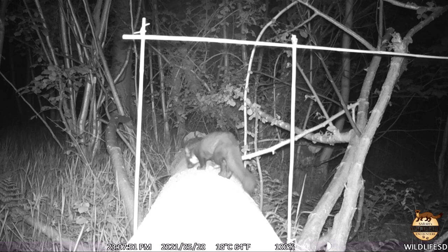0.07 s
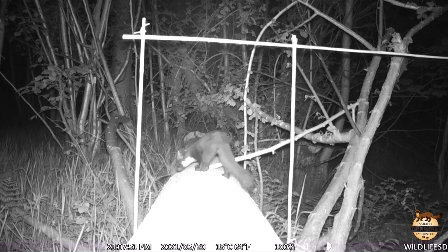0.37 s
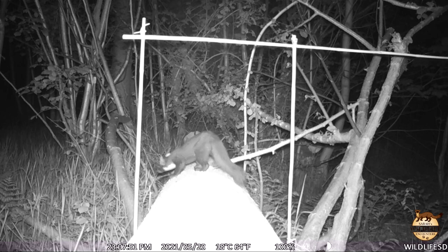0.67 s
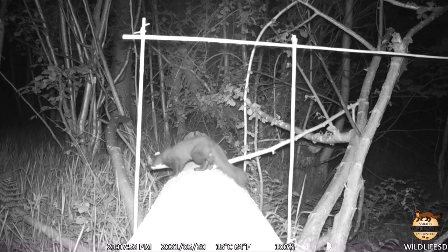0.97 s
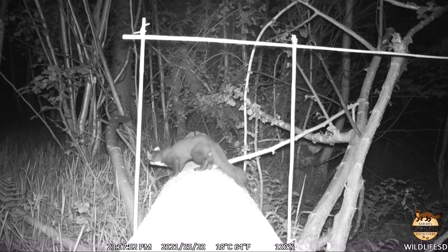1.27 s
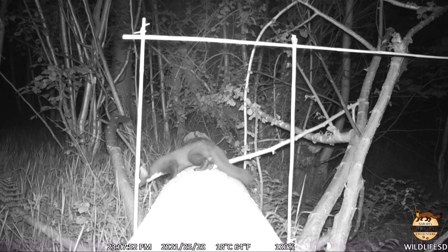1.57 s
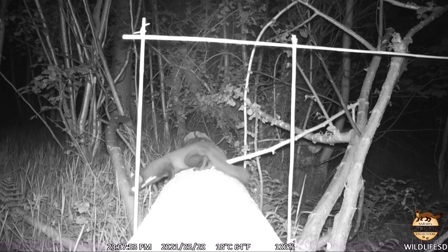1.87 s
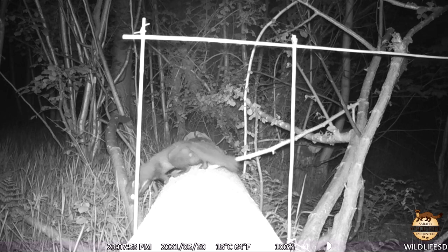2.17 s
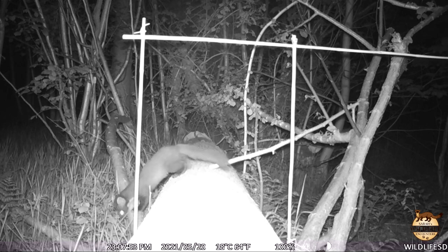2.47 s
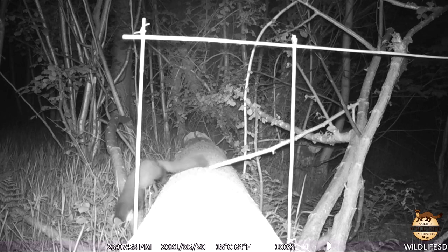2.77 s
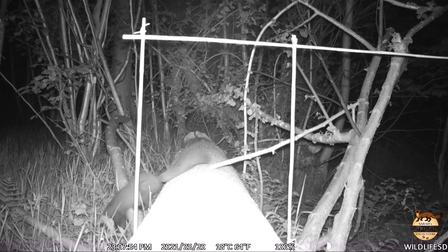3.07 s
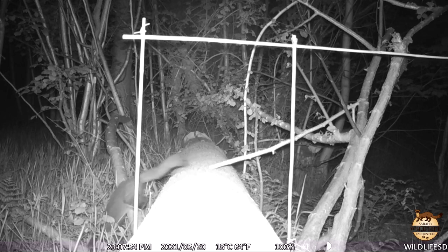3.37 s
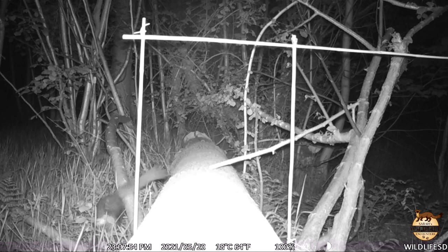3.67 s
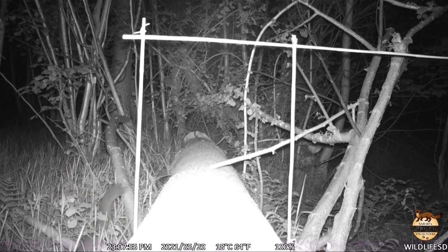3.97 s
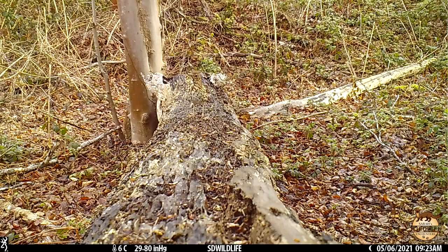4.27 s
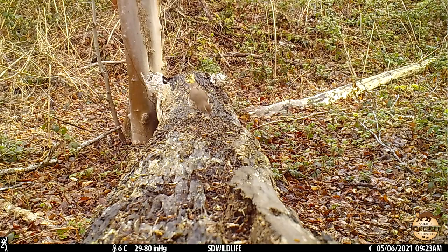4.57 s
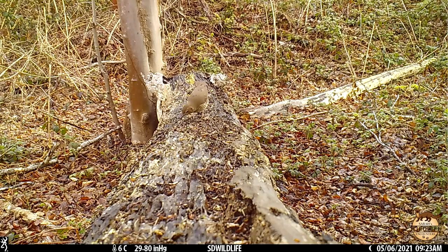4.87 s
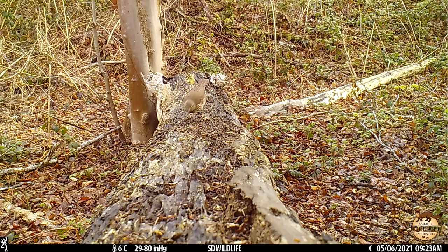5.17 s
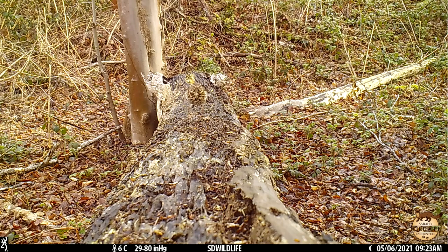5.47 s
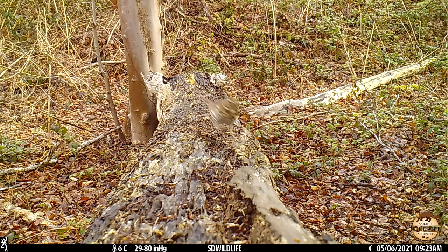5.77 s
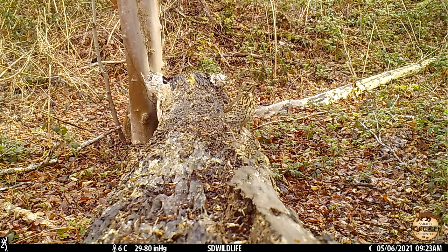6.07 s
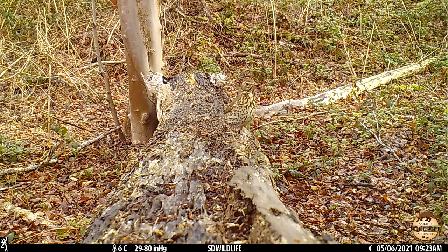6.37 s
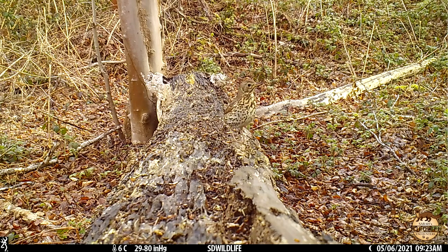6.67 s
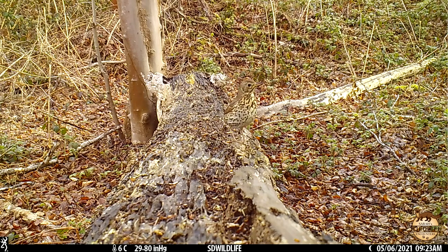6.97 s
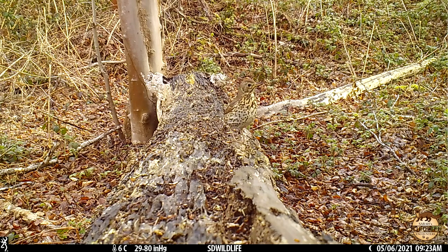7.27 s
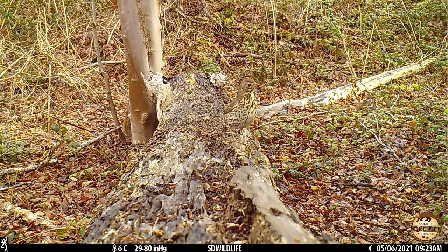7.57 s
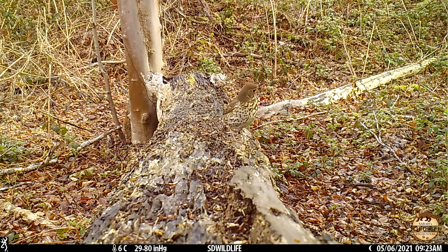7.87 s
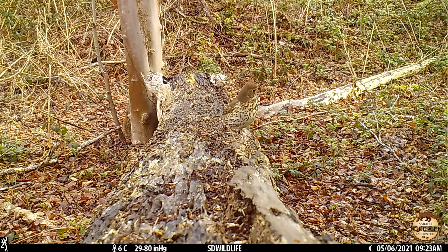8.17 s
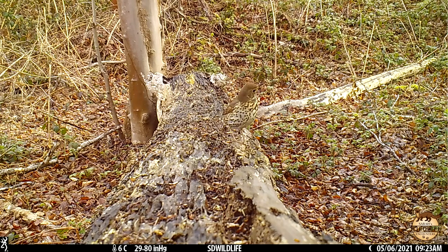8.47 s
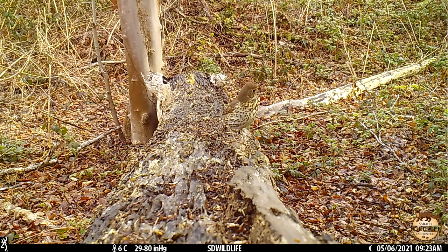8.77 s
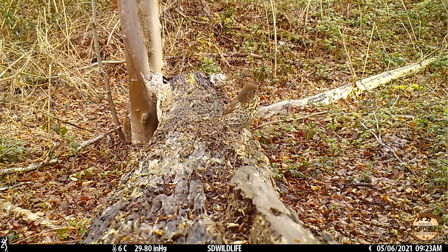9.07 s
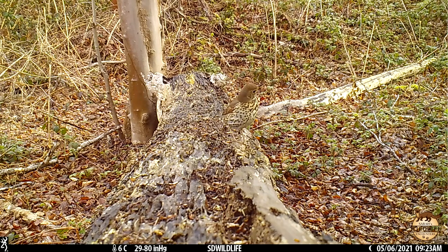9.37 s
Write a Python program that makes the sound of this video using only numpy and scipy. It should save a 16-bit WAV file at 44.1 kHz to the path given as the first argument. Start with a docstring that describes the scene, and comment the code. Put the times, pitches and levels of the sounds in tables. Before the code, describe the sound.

A muffled hiss from an outdoor microphone fills a quiet wood, broken by a single soft peep. Then night changes to day: the hiss turns brighter, with a thin buzz, and small birds sing almost continuously. Clear, quick whistles mix with rougher calls farther off and lower burry phrases. A few tiny ticks come from dry litter, a short trill follows, and a distant engine is barely audible.

```python
"""Songbirds whistle quick gliding notes, near sines from the syrinx that ring on between the trunks.
A lower bird adds burry phrases; hoarse calls and a short trill come from farther off.
Dry litter ticks and a far engine drones faintly. Two trail cameras hear this forest:
first the dull night hiss of one, with a faint peep; at about 4 s it fades over into the
spring morning, with the brighter hiss and thin buzz of the other."""
import sys
import numpy as np
from scipy import signal
from scipy.fft import rfft, irfft
from scipy.io import wavfile
from scipy.ndimage import map_coordinates

SR = 44100
rng = np.random.default_rng(int(sys.argv[2]) if len(sys.argv) > 2 else 0)


def digitize_waveform(pressure):
    """Quantize a signal to 16-bit integers and store it at the path in sys.argv[1].

    Rows of a 2-D input are taken as channels; values are limited to [-1, 1].
    """
    field = np.atleast_2d(pressure).T
    bounded = np.clip(field, -1, 1)
    quanta = np.round(bounded * 32767).astype(np.int16)
    wavfile.write(sys.argv[1], SR, quanta)


N = 424241
FADE_START_S, FADE_END_S = 4.015, 4.31

# clear notes: t/s, length/s, f/Hz, glide/Hz, level/dB
WHISTLES = [ (4.095, 0.031, 3980, -220, -46.5), (4.197, 0.033, 3860, -450, -50.5),
            (4.222, 0.071, 3170, -800, -51), (4.382, .1, 2500, -520, -56.5), (4.51, .065, 2910, 552, -59),
            (4.907, 0.065, 3610, -420, -45), (5.012, 0.032, 3600, 528, -51),
            (5.244, 0.038, 3520, 750, -46.5), (5.28, 0.039, 4030, 120, -46.5), (5.36, .03, 2680, -310, -57),
            (5.418, 0.0165, 2670, -470, -55), (5.637, .034, 4750, -330, -54),
            (5.671, .028, 4050, -520, -49.5), (5.772, 0.025, 4130, 0, -54),
            (5.801, 0.053, 3310, -120, -46.5), (5.878, 0.067, 3235, 40, -47.5),
            (5.956, 0.068, 3410, 206, -47), (5.97, .062, 4060, -700, -51.5), (6.105, 0.065, 2854, -40, -52),
            (6.408, 0.029, 3530, -340, -43.5), (6.45, .028, 4100, 243, -49),
            (6.465, 0.027, 3020, -440, -53), (6.477, 0.078, 3637, 2, -49), (6.584, 0.029, 3120, -40, -49),
            (6.602, 0.07, 3350, 53, -40), (6.887, 0.048, 2630, -60, -54), (7.173, 0.043, 3660, -600, -45.5),
            (7.249, 0.043, 3110, 250, -50.5), (7.293, .028, 3334, 360, -40.5),
            (7.421, 0.057, 3437, 64, -43.5), (7.697, 0.041, 3070, 148, -45),
            (7.742, 0.022, 3740, -110, -46), (7.798, 0.019, 3680, -210, -42), (7.844, 0.053, 3565, 0, -47),
            (7.881, 0.047, 4150, 0, -46), (7.929, 0.027, 4020, -110, -47), (8.081, 0.028, 4080, -600, -51),
            (8.108, 0.035, 3370, -500, -40), (8.14, 0.086, 3170, -140, -52), (8.235, .034, 2660, -240, -56),
            (8.305, .03, 2840, 200, -54), (8.394, 0.045, 3240, 438, -44.5), (9.195, .035, 3470, 3, -49.5),
            (9.245, 0.043, 3505, 0, -49.5)]


def whistler(easy_db=-49, arch_hz_per_db=11, loud_db=-39):
    """Nearest singer: effort arches loud notes upward; soft ones sag and blur more."""
    notes = []
    for start, length, hz, glide, db in WHISTLES:
        sound = note(length, hz, glide, db, rasp=.14, arch_hz=arch_hz_per_db * (db - easy_db))
        scattered = .22 + .012 * (loud_db - db)
        notes.append((start, sound, scattered))
    return song(notes, t60_s=1.04)


# hoarse notes: t/s, length/s, f/Hz, glide/Hz, level/dB
HOARSE_NOTES = [ (4.594, .073, 3350, 52, -58), (4.64, 0.045, 3700, -250, -59),
                (5.06, 0.03, 3710, 100, -52.5), (5.298, 0.039, 3380, -700, -49.5),
                (5.6, 0.051, 3770, -800, -50.5), (5.712, 0.03, 3580, 500, -48.5),
                (6.122, .052, 4300, -500, -54), (6.341, 0.052, 3620, 350, -47),
                (6.355, .019, 4085, -700, -48.5), (6.764, .055, 3080, 100, -46.5),
                (6.805, .057, 3290, -280, -50), (7.322, 0.035, 3540, -650, -44.5),
                (7.375, 0.044, 3580, 600, -49.5), (7.585, 0.054, 3230, -950, -47),
                (7.752, .034, 3220, -350, -53), (8.338, .055, 3280, -680, -47),
                (8.433, 0.044, 3267, -350, -45.5), (8.47, 0.023, 3730, 370, -44.5),
                (8.579, 0.042, 4120, 143, -52.5), (8.591, 0.0566, 3350, 298, -52),
                (8.71, .11, 4410, -1100, -61), (8.871, 0.081, 3940, 0, -55),
                (9.021, 0.02, 4400, -1100, -44.5), (9.038, 0.033, 3690, -100, -50),
                (9.262, 0.055, 4120, -640, -55), (9.323, 0.046, 3700, 233, -50.5),
                (9.492, 0.073, 3430, -150, -49), (9.505, 0.062, 4030, -1150, -52)]


def hoarse_bird(rasp=.654, scattered=.64):
    """Rough notes, smeared by the trees on their longer path."""
    return song([(start, note(length, hz, glide, db, rasp), scattered)
                 for start, length, hz, glide, db in HOARSE_NOTES], t60_s=1.34)


def trill(start_s=6.938, period_s=.0525, count=5, scattered=.64):
    """One steep downward sweep, repeated evenly."""
    sweeps = [note(length_s=.021, pitch_hz=3650, glide_hz=-1200, db=-48.5, rasp=.7) for _ in range(count)]
    return song([(start_s + k * period_s, sweep, scattered) for k, sweep in enumerate(sweeps)], t60_s=1.5)


# burry notes: t/s, length/s, f/Hz, glide/Hz, level/dB, burr/0-1
BURRY_NOTES = [ (4.224, .07, 2200, 60, -54, 0.6), (5.812, .075, 2000, -100, -62, 0.7),
               (6.105, 0.064, 2070, 70, -60, 0.5), (7.241, 0.12, 2030, 70, -58, 0.54),
               (7.482, 0.05, 1960, -60, -53, .1), (8.731, 0.055, 2190, 337, -51, .1),
               (8.754, 0.109, 2245, -62, -50.5, 0.24), (9.174, 0.06, 2130, 200, -52, 0.2),
               (9.222, .14, 2280, 219, -53.5, .8), (9.308, 0.024, 2430, -120, -50, 0.06),
               (9.37, .085, 2490, -65, -60, .3)]


def low_bird(scattered=.24):
    """Lower voice whose notes break into a rough burr."""
    return song([(start, note(length, hz, glide, db, rasp=.15 + .7 * burr, burr=burr), scattered)
                 for start, length, hz, glide, db, burr in BURRY_NOTES], t60_s=.64)


# single thin call: t/s, length/s, f/Hz, glide/Hz, level/dB
CHIP = (5.9717, .007, 7550, -850, -46)


def chip(sag_hz=600):
    """Tiny high call that dips in pitch, close and dry."""
    out = np.zeros(N)
    start, length, hz, glide, db = CHIP
    add(out, start, note(length, hz, glide, db, arch_hz=-sag_hz))
    return out


# bouts of distant song: start/s, end/s, level at low_hz/dB
BOUTS = [(4.0, 4.25, -53), (5.65, 6.55, -55.5), (6.95, 8.6, -54), (9.0, 9.62, -57)]


def far_birds(low_hz=2800, high_hz=4350, max_glide_hz=650, shortest_s=.0326, longest_s=.068,
              lull_db=-68, treble_db=-5, scattered=.8, count=90):
    """Birds deep in the wood: faint random glides that run together, louder in bouts."""
    notes = []
    for k, (when, stretch, height, slope) in enumerate(rng.random((count, 4))):
        start = FADE_START_S + (k + when) / count * (N / SR - FADE_START_S)
        length = shortest_s + stretch * (longest_s - shortest_s)
        hz = low_hz + height * (high_hz - low_hz)
        base_db = next((db for begin, end, db in BOUTS if begin <= start < end), lull_db)
        sound = note(length, hz, max_glide_hz * (2 * slope - 1), base_db + treble_db * height, rasp=.703)
        notes.append((start, sound, scattered))
    return song(notes, t60_s=.95)


# peep tones, a faint peep and a much fainter higher tone: t/s, length/s, f/Hz, level/dB
PEEP_TONES = [(1.775, .15, 2895, -57.5), (1.775, .15, 5105, -78.5)]


def night_peep():
    """Faint dry peep with a fluttering pitch."""
    out = np.zeros(N)
    for start, length, hz, db in PEEP_TONES:
        add(out, start, note(length, hz, 0, db, rasp=.13, flutter_db=0))
    return out


def note(length_s, pitch_hz, glide_hz, db, rasp=0, burr=0, arch_hz=0, burr_hz=55, flutter_db=1.3):
    """Gliding near sine from the syrinx; rasp jitters pitch, burr shakes pitch and level together."""
    progress = np.linspace(0, 1, int(length_s * SR))
    off_centre = progress - .5
    glide = glide_hz * off_centre * (1 - .486 * off_centre)  # slows toward the end
    arc_hz = pitch_hz + glide - arch_hz * (2 * off_centre) ** 2
    shake = np.sin(2 * np.pi * burr_hz * length_s * progress)
    hz = arc_hz * (1 + .0673 * rasp * walk(327, len(progress)) + .055 * burr * shake)
    envelope = np.abs(np.sin(np.pi * progress)) ** .65
    tremolo = (1 + burr * shake) / np.sqrt(1 + burr ** 2 / 2)
    amplitude = np.sqrt(2) * undb(db + flutter_db * walk(160, len(progress)))
    return amplitude * envelope * tremolo * np.sin(2 * np.pi * np.cumsum(hz) / SR)


def song(notes, t60_s):
    """Place notes (t/s, sound, scattered power share) in the wood; far singers arrive more scattered."""
    direct, sent = np.zeros(N), np.zeros(N)
    for start, sound, scattered in notes:
        add(direct, start, np.sqrt(1 - scattered) * sound)
        add(sent, start, np.sqrt(scattered) * sound)
    return direct + forest_scatter(sent, t60_s)


def forest_scatter(sound, t60_s, near_t60_s=.45, near_db=1, build_s=.0089):
    """Quick wash off the near trunks plus the long ring of the whole wood."""
    t = np.arange(int(1.5 * SR)) / SR
    decay = undb(-60 * t / t60_s) + undb(near_db - 60 * t / near_t60_s)
    response = rng.standard_normal(len(t)) * decay * (1 - np.exp(-t / build_s))
    return signal.fftconvolve(sound, response / np.linalg.norm(response))[:N]


# litter ticks: t/s, level/dB
TICKS = [(5.078, -45), (5.1388, -31.5), (5.160, -45), (5.174, -43)]


def litter(ring_hz=3750, ring_s=.0014, crack_hz=6000, crack_db=-10):
    """Dry leaves and twigs snap in a few cycles, a brief bright crack on top."""
    out, t = np.zeros(N), np.arange(int(ring_s * SR)) / SR
    window = np.sin(np.pi * t / ring_s) ** 2
    ring = window * np.sin(2 * np.pi * ring_hz * t)
    crack = undb(crack_db) * window ** 10 * np.sin(2 * np.pi * crack_hz * t)
    for start, db in TICKS:
        add(out, start, undb(db) * (ring + crack))
    return out


# engine swells: peak t/s, 1/e half width/s, level/dB
ENGINE_SWELLS = [(7.4, 0.39, -78), (9.2, 0.45, -71)]


def engine(t, pitch_hz=162, idle_db=-80, octave_db=-11, hum_hz=58.5, hum_end_db=-78):
    """Far engine: its note wavers and swells over a slowly growing deep hum."""
    phase = 2 * np.pi * np.cumsum(pitch_hz * (1 + .0059 * walk(4, N))) / SR
    swells = sum(undb(db) * np.exp(-((t - peak) / width) ** 2) for peak, width, db in ENGINE_SWELLS)
    drone = (undb(idle_db) + swells) * (np.sin(phase) + undb(octave_db) * np.sin(2 * phase))
    hum = undb(hum_end_db + 2 * walk(2.3, N)) * (t / t[-1]) * np.sin(2 * np.pi * hum_hz * t)
    return np.sqrt(2) * (drone + hum)


# night hiss spectrum: f/Hz, relative level/dB
NIGHT_SPECTRUM = [(15, 2.5), (30, 1.5), (130, 0.5), (400, -1.5), (700, -4.5), (1200, -8.5), (2600, -9.5),
                  (3300, -12), (3900, -22), (4800, -27), (5800, -40.5), (6600, -54.5), (7600, -67.5)]
# housing resonances: f/Hz, width/Hz, gain/dB
HOUSING_RESONANCES = [(227, 72, 3), (908, 110, 4), (1425, 33, 3.5), (1900, 83, 2.5), (2070, 110, 2.5),
                      (2220, 130, -2.5), (3000, 150, -0.5)]


def night_hiss(db=-46.5):
    """Dull hiss of the night camera, coloured by its housing."""
    return undb(db) * hiss(NIGHT_SPECTRUM, HOUSING_RESONANCES, band_hz=(0, SR / 2))


# day hiss spectrum: f/Hz, relative level/dB
DAY_SPECTRUM = [(20, -9.5), (120, -7), (230, -4.5), (450, -1), (900, 0), (1500, -1.5), (2600, -4),
                (3800, -1), (4400, -9.5), (5100, -7), (6200, -13), (8500, -15.5), (10200, -18),
                (12200, -20.5), (15500, -28.5)]
# peaks and dips: f/Hz, width/Hz, gain/dB
DAY_RIPPLES = [(1457, 66, 2.5), (5430, 570, -4), (11020, 640, -6), (13000, 620, -4), (14000, 500, 2)]
# narrow notch: f/Hz, width/Hz, gain/dB
DAY_NOTCH = [(5490, 230, -13)]


def day_hiss(band_db=-59.5, waver_db=.64):
    """Brighter hiss of the day camera; the level wavers slightly."""
    gain = undb(band_db + waver_db * walk(6, N))
    return gain * hiss(DAY_SPECTRUM, DAY_RIPPLES + DAY_NOTCH, band_hz=(300, 1700))


def camera_buzz(frame_hz=59.1, db=-74, band_hz=(5900, 9600)):
    """The electronics leak a thin crackle that repeats at the frame rate."""
    period = int(SR / frame_hz)
    burst = rng.standard_normal(period) * np.exp(-4.9 * np.arange(period) / period)
    bandpass = signal.butter(3, band_hz, "band", fs=SR, output="sos")
    buzz = signal.sosfilt(bandpass, np.resize(burst, N))
    return undb(db) * buzz / np.std(buzz)


def hiss(points, bumps, band_hz):
    """Noise with a broad colour and narrow peaks and dips; rms 1 inside the band."""
    f = np.arange(N // 2 + 1) * SR / N
    hz, db = np.transpose(points)
    colour_db = np.interp(np.log(f + 1), np.log(hz), db)
    for centre, width, bump_db in bumps:
        colour_db += bump_db * np.exp(-2 * ((f - centre) / width) ** 2)
    spectrum = rfft(rng.standard_normal(N)) * undb(colour_db)
    in_band = (f >= band_hz[0]) & (f <= band_hz[1])
    return irfft(spectrum, N) / np.std(irfft(spectrum * in_band, N))


def undb(db):
    """Decibels to gain."""
    return 10 ** (np.asarray(db) / 20)


def walk(rate_hz, size):
    """Smooth random wander, spread near 1."""
    steps = np.arange(size) * rate_hz / SR
    points = rng.standard_normal(int(steps[-1]) + 3)
    return map_coordinates(points, [steps], order=3, mode="nearest")


def add(track, start_s, sound):
    """Mix a sound into a track in place."""
    i = int(start_s * SR)
    part = sound[:max(len(track) - i, 0)]
    track[i:i + len(part)] += part


def scene():
    """Equal-power cross-fade from night to morning; mono."""
    t = np.arange(N) / SR
    night = night_hiss() + night_peep()
    floor = day_hiss() + camera_buzz()
    birds = whistler() + hoarse_bird() + trill() + low_bird() + chip() + far_birds()
    day = birds + litter() + engine(t) + floor
    fade_rad = np.pi / 2 * np.clip((t - FADE_START_S) / (FADE_END_S - FADE_START_S), 0, 1)
    return (np.cos(fade_rad) * night + np.sin(fade_rad) * day)[None]


def record(dry):
    """The recorder cuts the top with a steep low-pass."""
    top_hz = 15720
    return signal.sosfilt(signal.ellip(12, .1, 80, top_hz, fs=SR, output="sos"), dry)


dry = scene()
out = record(dry)
digitize_waveform(out)
```